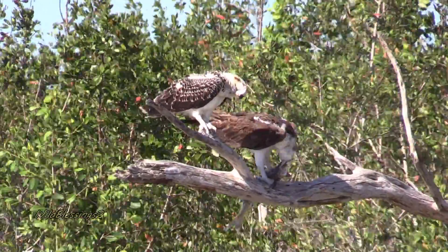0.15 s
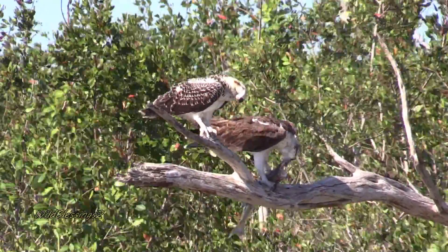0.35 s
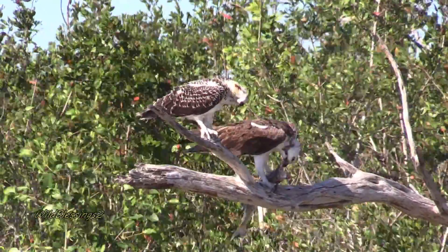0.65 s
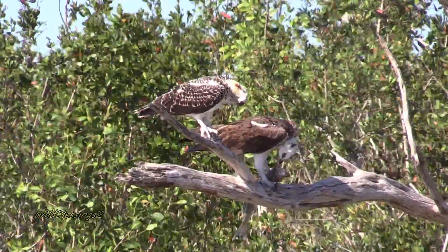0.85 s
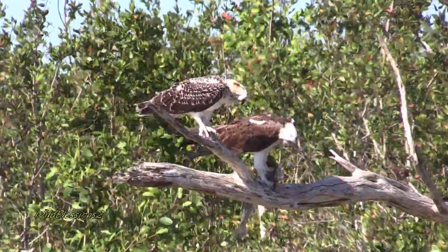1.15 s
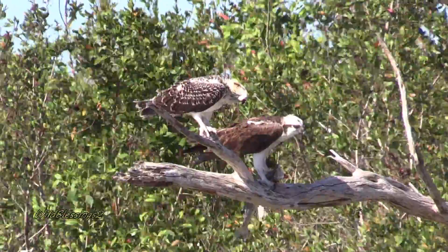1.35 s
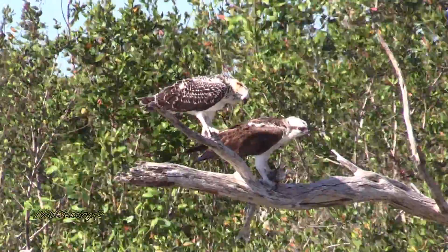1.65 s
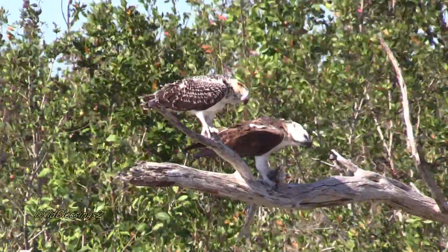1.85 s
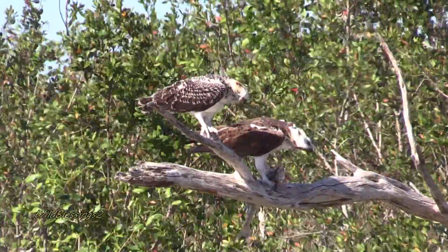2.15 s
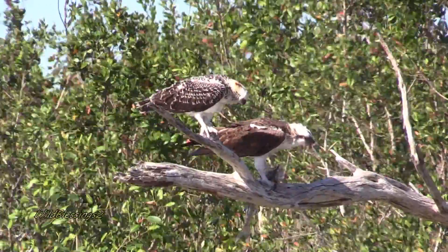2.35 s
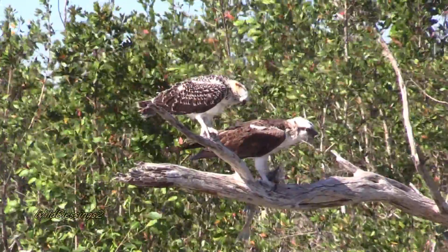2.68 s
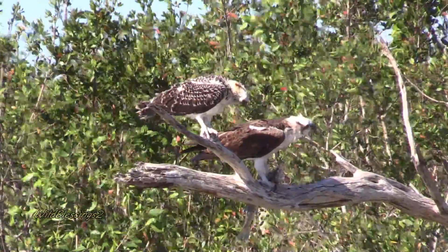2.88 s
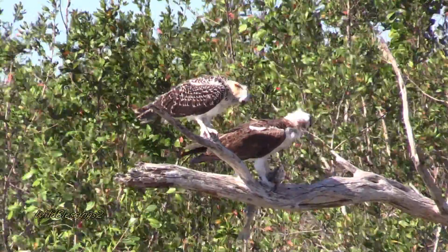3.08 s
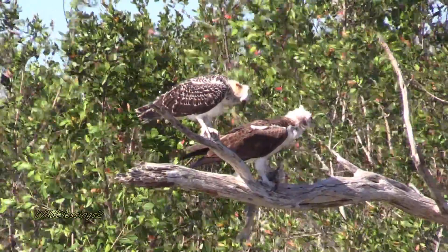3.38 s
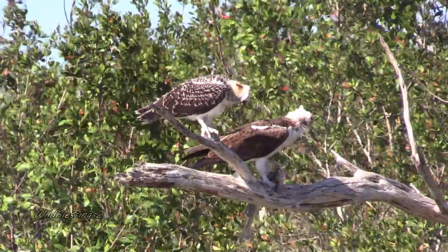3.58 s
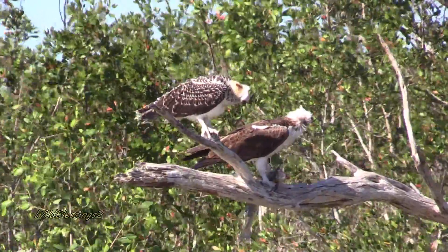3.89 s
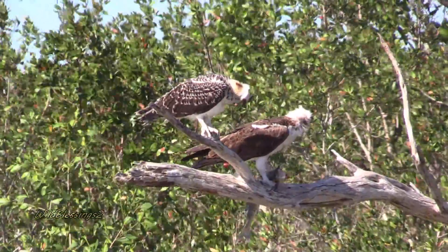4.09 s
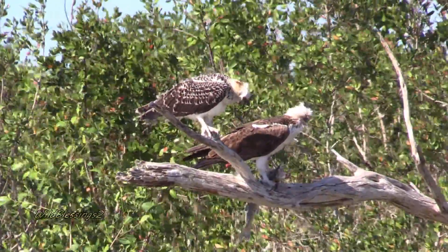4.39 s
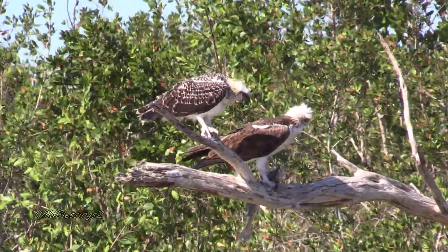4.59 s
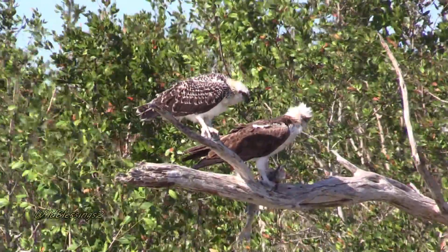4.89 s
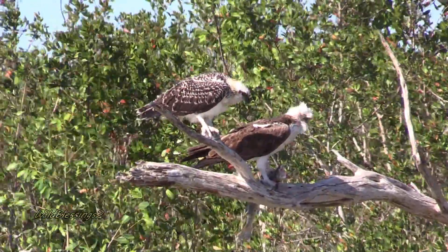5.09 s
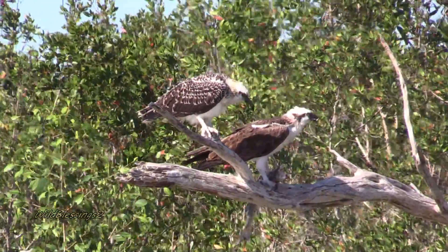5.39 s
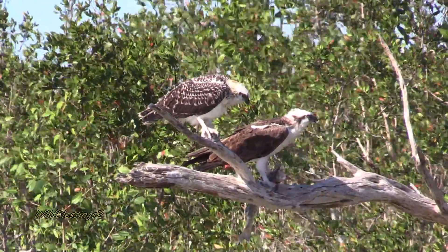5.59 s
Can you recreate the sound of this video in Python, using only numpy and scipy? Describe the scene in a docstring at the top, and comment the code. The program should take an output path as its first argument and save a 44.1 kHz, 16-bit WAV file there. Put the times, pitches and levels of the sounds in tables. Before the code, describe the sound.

Eleven piercing, quickly repeated bird whistles over hissing leaves, with buffeting wind on the microphone and small nasal chirps joining late.

```python
"""Young osprey begging in a windy wood

On a dead branch straight ahead, thin near-pure whistles crack into a rough second voice, then drop.
Nasal chirps, stacks of swooping harmonics, join in late; slurred songbird tones and slower chirps come from
further off, and noise tails make a faint tree echo. Shaped noise gives leaf hiss, dry ticks and a far wash;
low turbulence, thumps and snaps are the wind on the microphone."""
import sys
import numpy as np
from scipy import signal
from scipy.fft import rfft, irfft
from scipy.io import wavfile
from scipy.ndimage import uniform_filter1d

SR = 44100
rng = np.random.default_rng(int(sys.argv[2]) if len(sys.argv) > 2 else 0)


def materialize(psi):
    """Save the field psi as 16-bit PCM at rate SR to the path in sys.argv[1].

    A 1-D psi becomes a single channel; in a 2-D psi each row is a channel.
    """
    bounded = np.clip(np.atleast_2d(psi).T, -1, 1)
    quanta = np.round(bounded * 32767).astype(np.int16)
    wavfile.write(sys.argv[1], SR, quanta)


N = 253134
T = np.arange(N) / SR

# Event levels below are ahead of the level trims in the source functions.
# Steady wash of far trees and water: pitch_hz, gain_db
FAR_WASH = [(25, -73), (60, -1), (130, 5.5), (250, 0.5), (500, 2), (900, 1), (1400, 4.5), (2200, 3),
            (3200, -2), (5000, -10), (9000, -24.5)]
# Level of the leaf hiss, a drawn curve that stands in for gain control ducking under wind gusts:
# time_s, level_db
HISS_LEVEL = [(0.0, -61.5), (0.94, -61), (1.03, -57.5), (1.13, -69.5), (1.71, -60.5), (2.43, -67),
              (2.57, -74.5), (2.94, -63), (4.59, -64), (5.74, -67)]
# Hiss of near leaves: pitch_hz, gain_db
LEAVES = [(600, -38), (1500, -6.5), (3000, 4.5), (5000, 2), (7500, -1), (10000, -4.5), (12500, -11),
          (15500, -27)]
# Likeness of the two channels in wash and leaves: pitch_hz, correlation (-1 to 1)
LIKENESS = [(700, 1), (1700, 0.99), (2600, 0.62), (4000, 0.028), (6000, 0.0026), (8000, 0.28),
            (11000, 0.62), (15000, 0.096)]
# Stereo tilt of wash and leaves: pitch_hz, left_minus_right_db
STEREO_TILT = [(700, 0.5), (1500, 0.5), (2500, -1), (4500, 3), (8000, 5.5), (14000, 3.5)]
# Dry ticks among twigs and leaves: time_s, level_db
TICKS = [(1.3613, -58), (1.925, -61), (1.9809, -55), (2.278, -58), (2.6559, -63), (2.8473, -53.5),
         (3.264, -61), (3.3315, -56), (4.2368, -59), (4.6364, -57), (5.0584, -66), (5.284, -58)]

# Steady push of the wind on the microphone: time_s, level_db
GUSTS = [(0.0, -63), (0.38, -64), (0.84, -47), (1.13, -32.5), (1.55, -45), (1.78, -44), (2.07, -33),
         (2.25, -33.5), (2.35, -34.5), (2.54, -26.5), (2.62, -49.5), (3.02, -40.5), (3.21, -55),
         (4.57, -63), (4.8, -42.5), (5.28, -57), (5.74, -50)]
# Sudden buffets: start_s, length_s, level_db, crackle_over_rumble_db
BUFFETS = [(0.492, 0.0095, -44.5, -27), (0.618, 0.017, -43, -11), (0.666, 0.075, -38.5, -13.5),
           (0.793, 0.054, -39.5, -11), (0.938, 0.15, -33, -9), (1.026, 0.033, -23.5, -10),
           (1.295, 0.018, -42.5, -31), (1.61, 0.025, -38, -34), (1.821, 0.036, -41, -24),
           (1.889, 0.066, -33.5, -11.5), (2.12, 0.12, -33, -14), (2.404, 0.051, -29.5, -12),
           (2.47, 0.054, -37, -4.5), (2.621, 0.037, -30, -12), (2.682, 0.038, -33.5, -20),
           (2.821, 0.042, -37, -29), (2.903, 0.012, -35.5, -32), (3.023, 0.041, -31.5, -23),
           (3.085, 0.061, -37, -23), (3.263, 0.0092, -41, -27), (3.315, 0.058, -45, -32),
           (3.738, 0.066, -39, -17), (3.935, 0.038, -39.5, -29), (4.122, 0.086, -47, -34),
           (4.277, 0.024, -49, -30), (4.634, 0.047, -48, -30), (4.734, 0.012, -42.5, -30),
           (4.772, 0.03, -43.5, -28), (4.886, 0.03, -46, -40), (5.236, 0.017, -45, -18),
           (5.425, 0.023, -30.5, -21), (5.441, 0.045, -43, -9), (5.641, 0.033, -42, -14)]
# Rumble of the eddies: pitch_hz, gain_db
RUMBLE = [(25, -53), (42, -65), (70, -28), (120, -3.5), (200, 2.5), (300, -1.5), (430, -7), (600, -15.5),
          (900, -28), (2000, -35.5), (4000, -46), (9000, -82)]
# Crackle of tearing eddies: pitch_hz, gain_db
CRACKLE = [(300, 5.5), (650, 4.5), (2000, 3), (3200, -2), (5000, -18), (12000, -32)]
# Single hard eddies that knock on the microphone: time_s, level_db, pitch_hz
THUMPS = [(0.804, -22.5, 273), (1.042, -13.5, 306), (1.055, -15.5, 290), (1.097, -15.5, 233),
          (1.9, -23, 234), (2.071, -20, 260), (2.14, -20, 248), (2.431, -14, 267), (2.527, -24, 244),
          (3.028, -27, 238), (3.063, -22.5, 203), (3.396, -24, 233), (5.408, -23, 242), (5.471, -25.5, 239),
          (5.658, -33.5, 198), (5.728, -24.5, 173)]
# Snaps where an eddy tears at the port: time_s, level_db, band_hz (passes from 0.5 to 1.41 times this)
SNAPS = [(1.013, -28, 1300), (1.036, -36, 1700), (1.073, -39, 1300), (1.433, -35, 900),
         (2.099, -38.5, 2100), (2.192, -31, 1900), (2.431, -34, 1400), (2.459, -31, 1490),
         (2.49, -30.5, 1800), (2.521, -41, 1300), (2.553, -36.5, 2130), (2.63, -47, 1300),
         (2.706, -38, 1700)]
# How much harder the right port is hit, and each port's own turbulence against a shared part of 1
RIGHT_HARDER_DB, OWN_SHARE = 4.5, .85
# Soft edges of a buffet, as shares of its length
BUFFET_ATTACK_SHARE, BUFFET_RELEASE_SHARE = 0.22, 0.25

# Slurred notes of far songbirds: start_s, end_s, first_hz, last_hz, level_db
SLURS = [(.15, 0.261, 4150, 3950, -56.5), (0.445, 0.458, 1460, 1500, -43), (1.83, 1.91, 5450, 5080, -59),
         (1.775, 1.883, 4150, 4340, -54), (2.94, 3.021, 1870, 1797, -49.5), (3.015, 3.066, 1750, 1500, -52),
         (3.035, 3.063, 2860, 2580, -42.5), (3.039, 3.102, 5050, 5030, -59),
         (3.055, 3.11, 4060, 3500, -49.5), (3.105, 3.142, 1620, 1400, -46.5),
         (3.146, 3.176, 1103, 1043, -49.5), (3.14, 3.17, 2250, 2050, -50), (5.207, 5.393, 6750, 5850, -62),
         (5.255, 5.303, 1900, 1774, -46.5), (5.548, 5.568, 1800, 1980, -48.5)]
# Slower chirps of a bird further off: middle_s, length_s, top_hz, level_db,
# brightness_db (per harmonic above the second)
FAR_CHIRPS = [(4.995, 0.06, 1030, -40, 0), (5.305, 0.06, 1037, -46, 0), (5.61, 0.065, 1094, -42, 0)]
# Duller throat of that bird: pitch_hz, gain_db
FAR_THROAT = [(1000, -10), (2000, -10), (3100, -6.5), (4100, -24), (5200, -35), (7400, -48)]
# Near nasal chirps: middle_s, length_s, top_hz, level_db, brightness_db (per harmonic above the second)
CHIRPS = [(3.912, 0.025, 1260, -49.5, -8), (4.098, 0.03, 1230, -48.5, -9), (4.508, 0.03, 1230, -44.5, -1.5),
          (4.802, 0.027, 1207, -39, 0), (5.114, 0.033, 1234, -38, 0), (5.385, 0.035, 1228, -44.5, 1)]
# Throat that shapes the near chirps: pitch_hz, gain_db
THROAT = [(1000, -6), (1250, -7.5), (2400, 5.5), (3600, 3), (4850, -8), (6100, -17), (7400, -50),
          (9000, -64)]

# Lower register on the way into or out of a whistle: start_s, end_s, first_hz, last_hz, level_db
SCOOPS = [(1.306, 1.323, 2050, 2460, -43.5), (1.572, 1.585, 2000, 2400, -43),
          (1.821, 1.845, 2050, 2290, -44.5), (2.126, 2.145, 2030, 2470, -43.5),
          (2.382, 2.391, 2030, 2320, -46), (2.764, 2.784, 2100, 2380, -50),
          (3.087, 3.105, 2080, 2460, -41.5), (3.479, 3.495, 2030, 2420, -42),
          (3.734, 3.764, 2600, 2320, -43.5), (3.916, 3.935, 2030, 2330, -44.5),
          (4.262, 4.277, 2350, 2200, -50), (4.441, 4.445, 2130, 2400, -37), (4.707, 4.719, 2480, 2300, -41)]
# Upper voice of a cracked whistle: start_s, end_s, first_hz, last_hz, level_db, roughness (0 to 1)
CRACKS = [(1.066, 1.198, 4090, 4290, -45.5, 0.47), (1.953, 2.007, 4020, 4220, -48, 0.9),
          (2.56, 2.611, 4270, 4240, -52, 0.9), (3.254, 3.336, 4000, 4160, -47.5, 0.73),
          (3.645, 3.772, 3860, 4320, -45.5, 0.9), (4.159, 4.245, 4280, 4360, -45.5, 0.7),
          (4.613, 4.68, 4186, 4310, -40, 0.7)]
# Rasp that the two clashing voices throw out around themselves: pitch_hz, gain_db
CLASH = [(1500, -26), (2450, -8), (2900, -10), (3550, 3), (4350, -5), (5000, -18), (5600, -11), (6200, -16),
         (6800, -12), (7700, -16), (9500, -36), (13000, -56)]
# Begging whistles: start_s, end_s, held_hz, rise_hz (over the call), level_db, swell_db (over the call),
# drop_level_db, octave_db (over the tone while held), drop_octave_db, unsteadiness_db
WHISTLES = [(0.921, 1.204, 2953, 440.5, -35, -3, -31, -23, -10.5, 1.5),
            (1.32, 1.473, 3260, 71, -29.5, 1.5, -39, -36, -16, 1.9),
            (1.58, 1.747, 3284, -23, -37.5, 1, -48, -29, -18, 4),
            (1.83, 2.029, 3253, 0, -43.5, 16.5, -35.5, -31, -13.5, 4),
            (2.139, 2.297, 3270, -53, -38, -4, -41, -24, -16, 3),
            (2.399, 2.635, 3205, 89.5, -37.5, -5, -40, -23, -11.5, 2),
            (2.793, 2.976, 3270, 15, -35.5, 2.5, -39, -19, -12, 3.06),
            (3.101, 3.344, 3193, 12, -35.5, 4, -33, -20.5, -7, 1.9),
            (3.49, 3.771, 3229, 2, -32, -6, -25.5, -26, -17, 1.9),
            (3.929, 4.267, 3177, 197.5, -36, 8.5, -27.5, -23, -18.5, 1.7),
            (4.437, 4.718, 3227, -36.5, -37.5, 16, -28, -21.5, -13.5, 2.3)]
# Every whistle fades in while it slides up to its pitch from below
ATTACK_S, SLIDE_HZ, SLIDE_S = 0.013, 230.6, 0.01494
# Where the voice cracks, the tone is forced upward over STRAIN_S and weakens over BREAK_S
STRAIN_HZ, STRAIN_DB, STRAIN_S, BREAK_S = 179.4, -10.5, 0.0638, .03
# Every whistle falls to the same pitch, with a last push shortly before it stops
END_HZ, DROP_S, PUSH_LEAD_S, PUSH_WIDTH_S = 2913, .04, 0.018, 0.013

TOP_HZ = 15750  # upper limit of the recorder


def undb(db):
    """Decibels to gain."""
    return 10 ** (np.asarray(db) / 20)


def unit(x):
    """Scale to rms 1."""
    return x / np.sqrt(np.mean(x ** 2))


def level_over_time(rows):
    """Join time_s, level_db rows by straight lines."""
    s, db = np.transpose(rows)
    return np.interp(T, s, db)


def at(points, hz):
    """Read pitch_hz, value points on a log-frequency axis."""
    f, value = np.transpose(points)
    return np.interp(np.log(np.maximum(hz, 1)), np.log(f), value)


def colour(x, points):
    """Filter a sound by pitch_hz, gain_db points."""
    gain = undb(at(points, np.fft.rfftfreq(N, 1 / SR)))
    return irfft(rfft(x) * gain, N)


def walk(rate_hz):
    """Smooth random drift of rms 1: white noise with its content above rate_hz rolled off."""
    hz = np.fft.rfftfreq(N, 1 / SR)
    spectrum = rfft(rng.standard_normal(N)) / (1 + (hz / rate_hz) ** 4)
    return unit(irfft(spectrum, N))


def ramp(t, length):
    """0 before time zero, then a straight rise to 1 over the given length."""
    return np.clip(t / length, 0, 1)


def gate(t, start, end, fade):
    """1 from start to end, with rounded edges centred on both."""
    inside = np.minimum(t - start, end - t)
    return np.sin(np.pi / 2 * np.clip(inside / fade + .5, 0, 1)) ** 2


def span(start, end):
    """The samples of a note, with 20 ms of margin each side."""
    return slice(max(int((start - .02) * SR), 0), min(int((end + .02) * SR), N))


def turn(hz):
    """Phase of a tone with moving pitch."""
    return 2 * np.pi * np.cumsum(hz) / SR


def wide(points):
    """Outdoor noise from all round: alike in the bass, mostly unrelated through much of the treble."""
    hz = np.fft.rfftfreq(N, 1 / SR)
    mid, side = rfft(rng.standard_normal((2, N)))
    likeness = np.clip(at(LIKENESS, hz), -1, 1)
    sign = np.array([[1], [-1]])  # left, right
    pair = mid * np.sqrt(1 + likeness) + sign * side * np.sqrt(1 - likeness)
    gain_db = at(points, hz) + sign * at(STEREO_TILT, hz) / 2
    return unit(irfft(pair * undb(gain_db), N))


def foliage(leaves_db=10, flicker_db=1.23, air_db=-47, air_follows=0.33):
    """Near leaves hiss and flicker; the drawn gain-control curve dips the hiss, and the far wash less."""
    hiss_db = level_over_time(HISS_LEVEL)
    leaves = wide(LEAVES) * undb(hiss_db + leaves_db + flicker_db * walk(53))
    wash_db = air_db + air_follows * (hiss_db - np.mean(hiss_db)) + .5 * walk(27.0)
    return leaves + wide(FAR_WASH) * undb(wash_db)


def ticks(decay_s=0.0098, level_db=8.5, left_db=3):
    """Each tick is a burst of bright noise that starts at once and dies away exponentially."""
    force = np.zeros(N)
    for s, db in TICKS:
        i = span(s, s + .02)
        force[i] += undb(db) * (T[i] >= s) * np.exp(-np.abs(T[i] - s) / decay_s)
    bright = [(1500, -28), (5000, 6.5), (9000, 7), (15000, -15)]  # pitch_hz, gain_db
    snap = unit(colour(rng.standard_normal((2, N)), bright))
    return snap * force * undb(level_db + np.array([[left_db], [0]]))


def ports():
    """Turbulence at the left and right microphone port: a shared part and a part of its own."""
    noise = rng.standard_normal(N) + OWN_SHARE * rng.standard_normal((2, N))
    return noise * undb(RIGHT_HARDER_DB * np.array([[-.5], [.5]]))


def wind(lumpy_db=2.5, level_db=2.5, steady_db=0, steady_crackle_db=-19, crackle_db=0.0):
    """Eddies rumble at the two ports, the right one hit harder, and tear into a dense crackle."""
    push = undb(level_over_time(GUSTS) + steady_db)
    tearing = push * undb(steady_crackle_db)
    for start, length, db, tear_db in BUFFETS:
        attack_s, release_s = BUFFET_ATTACK_SHARE * length, BUFFET_RELEASE_SHARE * length
        attack = ramp(T - start + attack_s / 2, attack_s)
        release = np.exp(-np.maximum(T - start - length, 0) / release_s)
        blow = undb(db + level_db) * attack * release
        push = np.hypot(push, blow)
        tearing = np.hypot(tearing, blow * undb(tear_db + crackle_db))
    eddies = unit(undb(lumpy_db * walk(91.0)))
    rumble = colour(ports(), RUMBLE)
    # even out the rumble over 900 samples (20 ms): eddies stay of similar strength
    rumble /= np.sqrt(uniform_filter1d(rumble.mean(axis=0) ** 2, size=900))
    crackle = unit(colour(ports() * undb(4.5 * walk(320)), CRACKLE))
    low_cut = signal.butter(2, 60, "high", fs=SR, output="sos")
    return signal.sosfilt(low_cut, eddies * (rumble * push + crackle * tearing))


def thumps(level_db=-1, cycles=.9):
    """A single hard eddy knocks the diaphragm to and fro for a cycle or two."""
    out = np.zeros(N)
    phases = rng.uniform(0, 2 * np.pi, len(THUMPS))
    for (s, db, hz), phase in zip(THUMPS, phases):
        i = span(s, s)
        turns = (T[i] - s) * hz
        knock = np.exp(-(turns / cycles) ** 2) * np.cos(2 * np.pi * turns + phase)
        out[i] += undb(db + level_db) * knock
    return out


def snaps(width_s=0.0019, level_db=0):
    """A tearing eddy spits a few milliseconds of mid-range noise."""
    out = np.zeros((2, N))
    for s, db, hz in SNAPS:
        i = span(s, s)
        band = signal.butter(4, [hz / 2, hz * np.sqrt(2)], "band", fs=SR, output="sos")
        spit = unit(signal.sosfilt(band, ports()[:, i]))
        out[:, i] += undb(db + level_db) * spit * np.exp(-((T[i] - s) / width_s) ** 2)
    return out


def songbirds(patchy_db=2, waver=.005):
    """Slurred tones from deeper in the trees, a little patchy after their way through the leaves."""
    out, shake, patchy = np.zeros(N), walk(300), unit(undb(patchy_db * walk(83)))
    for start, end, first_hz, last_hz, db in SLURS:
        i = span(start, end)
        hz = np.interp(T[i], [start, end], [first_hz, last_hz]) * (1 + waver * shake[i])
        out[i] += np.sqrt(2) * undb(db) * np.sin(turn(hz)) * gate(T[i], start, end, 0.0044)
    return out * patchy


def chirps(table, throat, rise, fall, crest):
    """A stack of harmonics swoops up, levels off at the crest and sags, shaped by the throat."""
    out, shake = np.zeros(N), walk(300)
    for middle, length, top_hz, db, bright_db in table:
        i = span(middle - length / 2, middle + length / 2)
        along = np.clip((T[i] - middle) / length + .5, 0, 1)
        swoop = rise * (1 - along / crest) ** 2
        sag = fall * ((along - crest) / (1 - crest)) ** 2
        hz = top_hz * (1 - np.where(along < crest, swoop, sag) + 0.004 * shake[i])
        tone = 0
        for k in range(1, 8):
            harmonic_db = at(throat, k * hz) + bright_db * max(k - 2, 0)
            tone = tone + undb(harmonic_db) * np.sin(k * turn(hz))
        out[i] += undb(db) * tone * np.abs(np.sin(np.pi * along)) ** 0.74
    return out


def scoops(level_db=1.5, rasp=.025, octave_db=-18):
    """The voice passes through a lower register as it scoops into a whistle or falls out of a hard one."""
    out, shake = np.zeros(N), walk(170)
    for start, end, first_hz, last_hz, db in SCOOPS:
        i = span(start, end)
        hz = np.interp(T[i], [start, end], [first_hz, last_hz]) * (1 + rasp * shake[i])
        phase = turn(hz)
        tone = np.sin(phase) + undb(octave_db) * np.sin(2 * phase)
        out[i] += undb(db) * gate(T[i], start, end, 0.0041) * tone
    return np.sqrt(2) * undb(level_db) * out


def cracks(flutter=0.28, octave_db=-24, rasp_db=-7.0, swell_db=6, voice_db=-0.5, fade_s=0.026):
    """The other side of the syrinx sounds higher and unsteady; it swells out of a rasp and steadies."""
    pitch_rasp, wander, settle = .027, .011, .4
    out, shake, throb, drift = np.zeros(N), walk(410), walk(160), walk(86)
    clash = unit(colour(rng.standard_normal(N), CLASH) * undb(2.5 * walk(200)))
    for start, end, first_hz, last_hz, db, rough in CRACKS:
        i = span(start, end)
        along = np.clip((T[i] - start) / (end - start), 0, 1)
        unsteady = rough * (1 - settle * along)
        hz = first_hz + (last_hz - first_hz) * np.sin(np.pi / 2 * along)
        phase = turn(hz * (1 + unsteady * (pitch_rasp * shake[i] + wander * drift[i])))
        voice = np.sqrt(2) * (np.sin(phase) + undb(octave_db) * np.sin(2 * phase))
        voice *= undb(voice_db - swell_db * rough * (1 - along) ** 2)
        rasp = 2 * rough * undb(rasp_db) * clash[i] * np.abs(np.sin(np.pi * along)) ** .5
        fade = gate(T[i], start, end, fade_s)
        out[i] += undb(db) * (voice + rasp) * fade * (1 + flutter * unsteady * throb[i])
    return out


def whistles(level_db=-3.5, third_db=-44, waver=0.002, rasp=0.018, flutter=0.68, drop_db=-3.0,
             strain_reedy_db=1, reedy_db=-3, uneven_db=4):
    """A near-pure tone slides up and holds; a crack makes it climb, weaken and shake before the drop."""
    out, slow, shake, throb = np.zeros(N), walk(140), walk(510), walk(270)
    patchy, uneven = walk(60), walk(78)
    cracked = sum(gate(T, start, end, 0.0024) for start, end, *_ in CRACKS)
    for (start, end, held_hz, rise_hz, db, swell_db, push_db,
         octave_db, drop_octave_db, unsteady_db) in WHISTLES:
        i = span(start, end)
        age, left = np.maximum(T[i] - start, 0), end - T[i]
        along = age / (end - start)
        drop = 1 - ramp(left, DROP_S)  # 0 while held, 1 at the end
        breaks = [s for s, *_ in CRACKS if start < s < end]
        strain = sum(ramp(T[i] - s + STRAIN_S / 3, STRAIN_S) for s in breaks)
        broken = sum(ramp(T[i] - s + BREAK_S / 2, BREAK_S) for s in breaks)
        rough = cracked[i] * (1 - drop)

        hz = held_hz + rise_hz * along - SLIDE_HZ * np.exp(-age / SLIDE_S) + STRAIN_HZ * strain
        hz = hz + drop * (END_HZ - hz)
        shaking = (rasp * rough + .003 * drop) * shake[i]
        phase = turn(hz * (1 + waver * unsteady_db * slow[i] + shaking))

        held_octave_db = octave_db + reedy_db + strain_reedy_db * strain + uneven_db * uneven[i]
        second_db = held_octave_db + ramp(drop, 0.57) * (drop_octave_db - held_octave_db)
        tone = np.sin(phase) + undb(second_db) * np.sin(2 * phase) + undb(third_db) * np.sin(3 * phase)

        hold = undb(db + swell_db * along + STRAIN_DB * broken)
        hold = hold * (1 - np.exp(-age / ATTACK_S)) * (1 - drop)
        push = undb(push_db + drop_db) * np.exp(-((left - PUSH_LEAD_S) / PUSH_WIDTH_S) ** 2)
        strength = hold * undb(level_db + unsteady_db * patchy[i]) + push
        fluttering = 1 + flutter * rough * throb[i]
        out[i] += np.sqrt(2) * tone * strength * fluttering * gate(T[i], start, end, 0.004)
    return out


def trees(x, near_db=-14, far_db=-7.5):
    """Foliage close behind the perch smears notes; far trunks add a fading echo, unlike in each channel."""
    t, echo = T[:SR], 0
    # level dB, time to fall 60 dB (s), onset (s): near foliage, far trunks
    for db, t60, onset in (near_db, .13, .004), (far_db, .54, .018):
        tail = rng.standard_normal((2, SR)) * undb(-60 * t / t60) * (1 - np.exp(-t / onset))
        echo = echo + undb(db) * tail / np.sqrt(np.sum(tail ** 2, axis=1, keepdims=True))
    return signal.fftconvolve(x[None], echo, axes=1)[:, :N]


def scene(nasal_echo_db=-7, far_db=-1, far_echo_db=0):
    """The osprey's whistles come from straight ahead; other birds are further off and wetter."""
    osprey = whistles() + scoops() + cracks()
    nasal = chirps(CHIRPS, THROAT, rise=0.28, fall=0.05, crest=0.61)
    far = songbirds() + chirps(FAR_CHIRPS, FAR_THROAT, rise=0.26, fall=0.12, crest=0.57)
    echo = trees(osprey + undb(nasal_echo_db) * nasal + undb(far_echo_db) * far)
    birds = osprey + nasal + undb(far_db) * far + echo
    return birds + ticks() + foliage() + wind() + thumps() + snaps()


def record(dry, mono_hz=680):
    """The camera folds the bass to mono against wind and cuts the top."""
    mid, side = (dry[0] + dry[1]) / 2, (dry[0] - dry[1]) / 2
    side = signal.sosfilt(signal.butter(4, mono_hz, "high", fs=SR, output="sos"), side)
    top_cut = signal.ellip(10, .2, 70, TOP_HZ, fs=SR, output="sos")
    return signal.sosfilt(top_cut, np.array([mid + side, mid - side]))


dry = scene()
out = record(dry)
materialize(out)
```